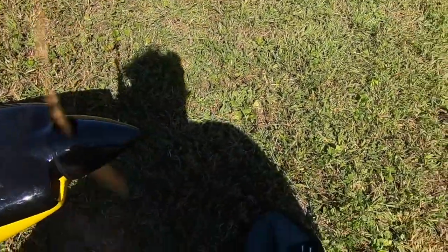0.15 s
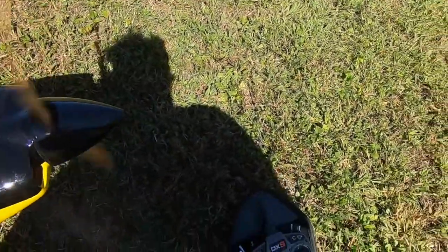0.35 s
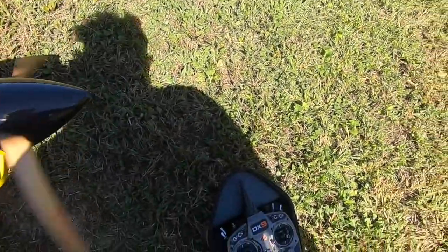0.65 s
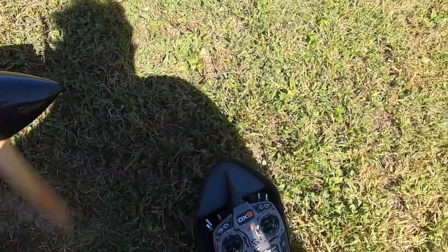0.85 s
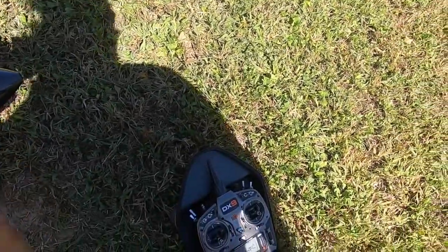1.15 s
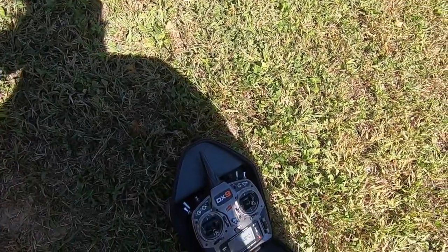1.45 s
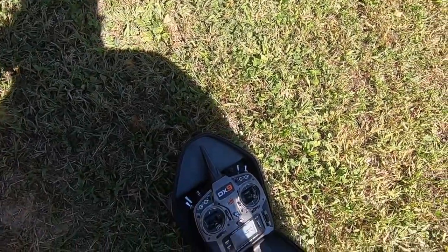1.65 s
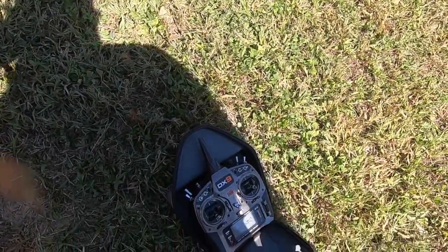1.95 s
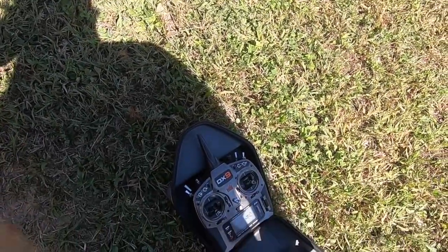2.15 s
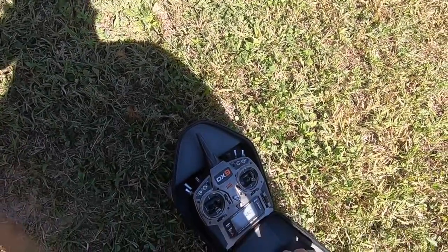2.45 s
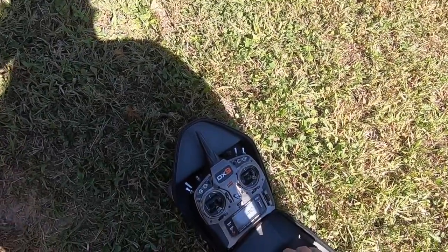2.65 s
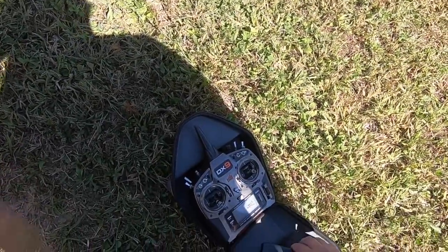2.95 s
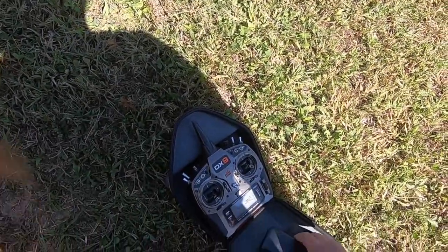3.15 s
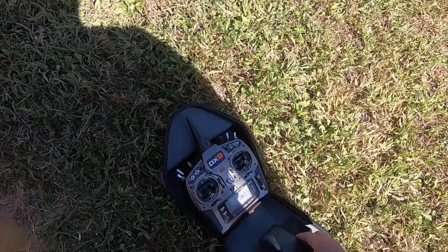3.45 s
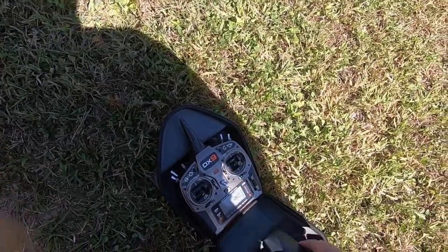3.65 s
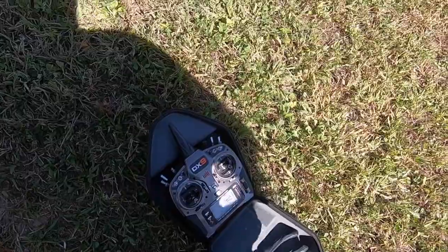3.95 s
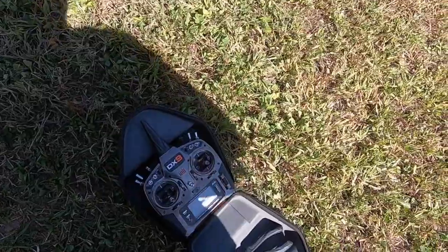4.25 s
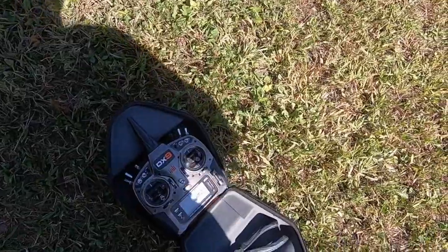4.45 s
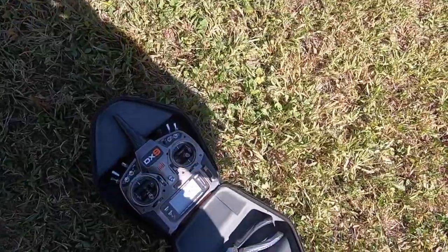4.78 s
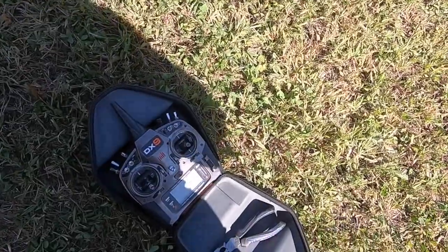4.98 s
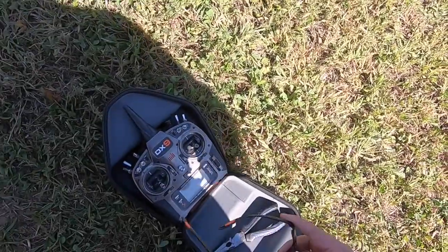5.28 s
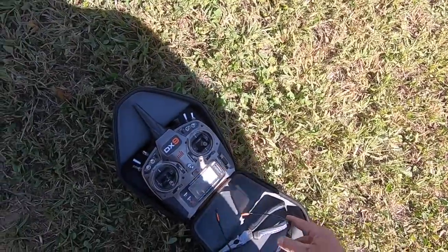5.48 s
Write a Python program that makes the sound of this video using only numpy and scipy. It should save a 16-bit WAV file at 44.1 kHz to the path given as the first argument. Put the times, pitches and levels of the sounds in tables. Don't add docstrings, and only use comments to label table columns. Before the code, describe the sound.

Close by on grass, a model plane's gas engine putters unevenly, its propeller humming while the muffler knocks and a loose panel pings.

```python
import sys
import numpy as np
from scipy import signal
from scipy.fft import rfft, irfft, next_fast_len
from scipy.io import wavfile
from scipy.ndimage import uniform_filter1d, map_coordinates

SR = 44100
rng = np.random.default_rng(int(sys.argv[2]) if len(sys.argv) > 2 else 0)


def bounce(signal):
    frames = np.transpose(np.atleast_2d(signal))
    limited = np.clip(frames, -1, 1)
    pcm = np.round(limited * 32767).astype(np.int16)
    wavfile.write(sys.argv[1], SR, pcm)


def invert_db(level):
    return 10 ** (np.asarray(level, dtype=float) / 20)


N = 247842
T = (np.arange(SR // 10) - 800) / SR

TURN_HZ = 51.5
USUAL_TURNS = 3

# (time [s], far colour [0-1], stereo width [dB], exhaust
# in view [dB], can in view [dB])
WALK = [(0, 0.07, -73, 0, 3.5), (.4, 0.05, -68, -0.5, 3.5), (1.0, 0.11, -65, 0, 0.5),
        (1.7, 0.06, -66, -0.5, -0.5), (3.04, 0, -65, -0.4, 0), (3.1, 0.2, -25, -0.7, 0.5),
        (3.3, 0, -9.5, -0.5, -2), (3.6, 0.1, -1.5, -1, -3), (4.0, 0.46, 0, -1.2, -2),
        (4.25, 0.76, 2.5, -1, 0.5), (5.62, 1, 6.5, -1.4, 2.5)]
# (time [s], level [dB])
LOAD = [(0, -1), (.38, 0.5), (.74, 0), (1.27, 0.5), (1.78, -0.5), (2.2, 1.5), (2.36, -1.5), (2.54, 3),
        (2.77, -1.5), (3.35, 0.5), (3.7, -1.5), (4.41, -3.5), (4.6, -6), (5.62, -5)]


def unit(x):
    return x / np.sqrt(np.mean(x ** 2) + 1e-20)


def along(points, hz):
    f, v = np.transpose(points)
    return np.interp(np.log(hz + 1), np.log(f + 1), v)


def curves(rows):
    s, *cols = np.transpose(rows)
    return [np.interp(np.arange(N) / SR, s, c) for c in cols]


def filtered(x, response):
    m = next_fast_len(N + 8192)
    return irfft(rfft(x, m) * response(np.fft.rfftfreq(m, 1 / SR)), m)[..., :N]


def ring(t, delay_ms, hz, t60_s, attack_s):
    u = np.maximum(t - delay_ms / 1000, 0)
    return np.sin(2 * np.pi * hz * u) * invert_db(-60 * u / t60_s) * (1 - np.exp(-u / attack_s))


def played(times_s, sizes, shape, lead=800):
    train = np.zeros(N + SR)
    np.add.at(train, np.round(times_s * SR).astype(int) + SR // 2 - lead, sizes)
    return signal.fftconvolve(train, shape)[SR // 2:][:N]


def firings():
    # (first [s], last [s], spacing [turns], crack [dB])
    runs = [(.0743, .135, 3, -29), (.1945, .2566, 3, -28), (.3949, .573, 3, -27), (.6907, .7494, 3, -25.5),
            (.8092, .8681, 3, -28), (.9478, 1.0265, 4, -25), (1.0841, 1.24, 2, -27),
            (1.2979, 1.5319, 3, -27), (1.5901, 1.7627, 3, -26), (1.8014, 1.9198, 3, -26),
            (1.9992, 2.1746, 3, -26), (2.2511, 2.3077, 3, -26), (2.3872, 2.4465, 3, -25),
            (2.5414, 2.5986, 3, -25), (2.6367, 2.695, 3, -26), (2.7549, 2.8759, 3, -27),
            (2.9731, 3.1445, 3, -26), (3.1818, 3.2565, 2, -29), (3.3128, 3.3507, 2, -25),
            (3.4073, 3.4838, 4, -25), (3.5422, 3.6554, 3, -24), (3.7136, 3.9412, 3, -23),
            (4.0798, 4.138, 3, -23), (4.2153, 4.2929, 4, -23), (4.4485, 4.5641, 3, -24.5),
            (4.6028, 4.6414, 2, -23), (4.7009, 4.7584, 3, -22.5), (4.8176, 4.9346, 3, -22.5),
            (5.0135, 5.1305, 3, -23), (5.2465, 5.4828, 3, -24)]
    # (time [s], boom [dB], crack [dB])
    singles = [(.0109, 0, -29), (.3372, 0, -25), (.6319, 0, -23), (.8882, 0, -28), (1.1819, -1, -31),
               (1.3749, 0, -30), (1.4533, 0, -30), (1.5122, 0, -36), (1.5698, -14, -35), (1.9397, 0, -27),
               (2.4843, 0, -32), (2.5025, -4, -34), (2.5215, -12, -32), (2.5796, 0, -30), (2.9147, 0, -32),
               (2.9341, 0, -30), (3.2753, 0, -29), (3.3317, -1, -33), (3.4454, -1, -33), (3.4647, 0, -30),
               (3.9803, -1, -27), (4.0, -1, -23), (4.3499, 0, -26), (4.5447, -2, -34), (5.1687, -3, -29),
               (5.1878, 0, -26), (5.2261, -14, -34), (5.4042, -1, -29), (5.4426, -14, -34), (5.5409, 0, -24)]
    boom_per_turn_db, knock_per_turn_db, crack_per_turn_db = 0.5, 1.2, 1.5
    base_knock_db, knock_scatter_db, crack_scatter_db = -18.5, 0.64, 1.6

    rows = [(*row, 0) for row in singles]
    for first_s, last_s, spacing, db in runs:
        count = round((last_s - first_s) * TURN_HZ / spacing) + 1
        rows += [(s, 0, db, 1) for s in np.linspace(first_s, last_s, count)]
    s, boom_db, crack_db, even = np.transpose(sorted(rows))

    gap_s = np.diff(s, prepend=s[0] - USUAL_TURNS / TURN_HZ)
    extra = np.round(gap_s * TURN_HZ) - USUAL_TURNS
    missing = np.minimum(extra, 0)
    walk_s, _, _, *views = np.transpose(WALK)
    exhaust_db, can_db = (np.interp(s, walk_s, view) for view in views)
    luck = rng.standard_normal((len(s), 2))
    knock_db = base_knock_db + can_db + knock_per_turn_db * missing
    knock_db += .15 * boom_db + knock_scatter_db * luck[:, 0]
    crack_db = crack_db + even * (crack_per_turn_db * extra + crack_scatter_db * luck[:, 1])
    return s, boom_db + exhaust_db + boom_per_turn_db * missing, knock_db, crack_db


def crankshaft(s):
    fire = np.r_[s[0] - 3 / TURN_HZ, s, s[-1] + 4 / TURN_HZ]
    gaps = np.diff(fire)
    count = np.round(gaps * TURN_HZ).astype(int)
    since = np.concatenate([np.arange(k) for k in count])
    k, start, gap = (np.repeat(v, count) for v in (count, fire[:-1], gaps))
    bend = .022 * since * (k - since) / TURN_HZ
    return start + gap * since / k - bend, since


def muffler(fired, turns, since):
    # (delay [ms], frequency [Hz], t60 [s], signed size)
    boom_modes = [(-.3, 320, .103, -.18), (1.34, 248, .034, 1.38), (.28, 107, .036, -.37),
                  (6.2, 213, .15, .07)]
    # (delay [ms], frequency [Hz], t60 [s], signed size)
    puff_modes = [
        (2.63, 208, .023, 3.9),
        (9.8, 298, .031, -1.48),
        (13.5, 143, .025, .97),
    ]
    pump_db = 2.75 + 2.3 * curves(WALK)[2]

    s, size_db = fired[:2]
    boom = sum(size * ring(T, delay, hz, t60, .0013) for delay, hz, t60, size in boom_modes)
    out = invert_db(1.98) * played(s, invert_db(size_db), boom)
    burnt = (since == 0) * invert_db(np.interp(turns, s, size_db))
    for delay, hz, t60, size in puff_modes:
        scatter = rng.standard_normal((len(turns), 2))
        sizes = (.93 - .31 * burnt) * invert_db(.8 * scatter[:, 0])
        puff = size * ring(T, delay, hz, t60, .01)
        out += invert_db(pump_db) * played(turns + .00015 * scatter[:, 1], sizes, puff)
    return out


def cracks(fired, far):
    # (delay [ms], frequency [Hz], t60 [s], level [dB])
    near_modes = [
        (0, 1520, .011, 2),
        (.5, 690, .014, -6),
        (.8, 4250, .008, 3),
        (1.2, 3100, .02, -12),
        (0, 7600, .01, -8),
        (.8, 5400, .005, -5),
    ]
    # (delay [ms], frequency [Hz], t60 [s], level [dB])
    far_modes = [
        (0, 1660, .011, 1),
        (.5, 800, .01, -7),
        (1, 4300, .007, 2),
        (1.2, 3360, .042, -13),
        (1.2, 8700, .004, -17),
        (1, 5300, .005, -5),
    ]
    # (pitch share, level [dB])
    uneven = [(.02, .7), (.03, 2), (.03, 1), (.012, 3), (.02, 3), (.05, 3)]
    ground = round(.0052 * SR)

    out, t = np.zeros(N + SR), np.arange(SR // 32) / SR
    for s, _, knock_db, crack_db in np.transpose(fired):
        start = round(s * SR)
        share = far[start]
        blows_db = [knock_db] * 2 + [crack_db] * 4
        scatter = np.array(uneven) * rng.standard_normal((len(uneven), 2))
        for db, near, back, (detune, luck_db) in zip(blows_db, near_modes, far_modes, scatter):
            delay, _, t60, mode_db = (1 - share) * np.array(near) + share * np.array(back)
            hz = near[1] ** (1 - share) * back[1] ** share * (1 + detune)
            mode = ring(t, delay, hz, t60, 0.00047)
            out[start - 20:][:len(t)] += invert_db(db + 4 + mode_db + luck_db) * mode
    out[ground:] += invert_db(-17) * out[:-ground]
    return out[:N]


def propeller(turns):
    orders = [
        (1, .186),
        (2, .236),
    ]
    angle = np.interp(np.arange(N) / SR, turns, np.arange(len(turns)))
    load_db, = curves(LOAD)
    levels_db = -32 + .15 * load_db, -18.5 + load_db
    return sum(np.sqrt(2) * invert_db(db) * np.sin(2 * np.pi * k * (angle - lag))
               for (k, lag), db in zip(orders, levels_db))


def rush(fired, turns, far):
    # (frequency [Hz], level [dB per Hz])
    near_db = [(190, -4.5), (330, -3.5), (387, -7.5), (488, -17), (682, -18), (939, -25), (1580, -22.5),
               (1800, -30), (2870, -32), (3570, -38), (4070, -33.5), (4500, -36.5), (7480, -40),
               (10600, -52), (13800, -95), (22000, -120)]
    # (frequency [Hz], level [dB per Hz])
    far_db = [(190, -21), (330, -2.5), (503, -16.5), (662, -22), (886, -22.5), (1150, -27.5), (1680, -23),
              (2210, -29.5), (3220, -28), (3670, -32.5), (4250, -32.5), (4980, -36), (8650, -44.5),
              (10600, -50), (13800, -89), (22000, -120)]
    # (frequency [Hz], level [dB])
    bass_db = [(250, -8), (450, 0)]
    rush_db, fizz_db = -28.5 + 0.22 * curves(LOAD)[0], -8

    s, _, knock_db, crack_db = fired
    after = np.maximum(T - .0006, 0)
    burn = np.exp(-((T + 0.001) / 0.0073) ** 2) * (T < 0)
    blow = 2.6 * np.exp(-after / .0014) + .7 * np.exp(-after / .01)
    blow *= 1 - np.exp(-after / .0005)
    puff_shape = .15 * np.exp(-((T - .002) / .005) ** 2)
    puff = played(turns, invert_db(6 * rng.standard_normal(len(turns))), puff_shape)

    slow = map_coordinates(rng.standard_normal(N // 60 + 4), [np.arange(N) / 60])
    noise = invert_db(1.92 * slow) * rng.standard_normal((2, N))
    flare = noise * (puff + played(s, invert_db(knock_db + 19.5), .5 * burn + blow))
    low = noise + filtered(flare, lambda hz: 1 / (1 + (600 / (hz + 1)) ** 4))
    high = noise * (1 + played(s, invert_db(crack_db + 33), 0.72 * .5 * burn + blow))

    def upper(hz):
        return 1 / (1 + (2450 / (hz + 1)) ** 6)

    def lower(hz):
        return 1 - upper(hz)

    def band(x, part):
        near, back = (unit(filtered(x, lambda hz: part(hz) * invert_db(along(c, hz) + along(bass_db, hz))))
                      for c in (near_db, far_db))
        return (1 - far) * near + far * back

    return invert_db(rush_db + 4.5) * (band(low, lower) + invert_db(fizz_db - 6.5) * band(high, upper))


def reed(turns, since, far):
    # (frequency [Hz], width [Hz])
    colours = [
        (7600, 600),
        (8800, 1100),
    ]
    shape = np.exp(-((T - .009) / .0015) ** 2) + .6 * np.exp(-((T - .0157) / .0013) ** 2)
    slap = 0.22 + played(turns, invert_db(since + 3.4 * rng.standard_normal(len(turns))), shape)
    noise = slap * rng.standard_normal((2, N))
    near, back = (unit(filtered(noise, lambda hz: 1 / (1 + ((hz - c) / w) ** 2))) for c, w in colours)
    return invert_db(-59) * (1 - far) ** 2 * near + invert_db(-48) * far * back


def cowl(turns, since, far):
    # (delay [ms], frequency [Hz], t60 [s], level [dB])
    panels = [(0, 665, .045, -31), (8, 1120, .03, -43)]
    luck = rng.standard_normal((len(turns), 2 * len(panels)))
    charge_db = 2.5 * np.minimum(since, USUAL_TURNS)
    out = 0
    for k, (delay, hz, t60, db) in enumerate(panels):
        times_s = turns + 0.00029 * luck[:, 2 * k]
        sizes = invert_db(db + charge_db + 3.4 * luck[:, 2 * k + 1])
        out = out + played(times_s, sizes, ring(T, delay, hz, t60, .002))
    return invert_db(-3 * far) * out


def pings():
    # (time [s], level [dB])
    blows = [(2.3867, -33), (4.139, -30), (4.2929, -30), (4.5641, -30.5), (4.759, -31), (4.8164, -36),
             (4.8761, -35), (4.9352, -29), (5.0146, -26), (5.2465, -32), (5.3651, -25.5), (5.4238, -32)]
    s, db = np.transpose(blows)
    plate = ring(T, delay_ms=1.666, hz=3360, t60_s=.042, attack_s=0.00022)
    return played(s, invert_db(db + 5.5), plate)


def scene():
    # (frequency [Hz], side share in step with mid)
    lean = [(60, 0.12), (110, 0.0018), (190, 0.016), (330, 0), (590, 0.019), (1050, 0.37), (1850, 0.13),
            (3300, 0.24), (5800, 0), (10000, 0.016)]
    # (frequency [Hz], level [dB])
    spread_db = [(200, -43), (330, -28), (590, -10.5), (1050, -11), (1850, -9), (3300, -9.5), (5800, -3.5),
                 (10300, 0.5), (14000, -8)]
    fired = firings()
    turns, since = crankshaft(fired[0])
    far, width_db = curves(WALK)[:2]
    air, stray = rush(fired, turns, far) + reed(turns, since, far)
    mid = muffler(fired, turns, since) + propeller(turns) + cracks(fired, far)
    mid = mid + pings() + cowl(turns, since, far) + air
    stray = stray + cracks(fired, far)
    side = filtered(mid, lambda hz: along(lean, hz))
    side = side + filtered(stray, lambda hz: invert_db(along(spread_db, hz)))
    return mid + invert_db(width_db) * side * [[1], [-1]]


def band_limit(x):
    return signal.sosfilt(signal.butter(12, 15830, fs=SR, output="sos"), x)


def record(dry):
    # (frequency [Hz], level [dB])
    hiss_db = [(9000, -51), (11000, -9), (12000, 2), (13500, -1), (15000, -9), (16000, -11)]
    top_db = [(10500, -0.5), (11100, -1.0), (14000, -7), (15800, -19)]  # (frequency [Hz], level [dB])
    wet = filtered(dry, lambda hz: 1j * hz / (12 + 1j * hz) * invert_db(along(top_db, hz)))
    wet = wet / (1 + np.abs(wet / .95) ** 6) ** (1 / 6)
    treble = np.abs(filtered(wet.mean(0), lambda hz: hz > 5000))
    follow = .3 + unit(uniform_filter1d(treble, size=90)) ** 1.1
    hiss = filtered(rng.standard_normal(wet.shape), lambda hz: invert_db(along(hiss_db, hz)))
    mix = wet + invert_db(-63.5) * unit(follow * hiss)
    return band_limit(mix)


dry = scene()
out = record(dry)
bounce(out)
```